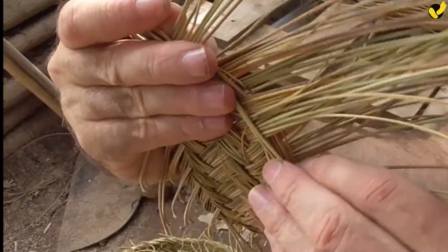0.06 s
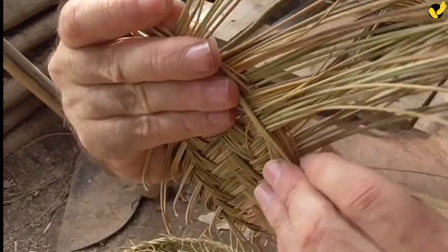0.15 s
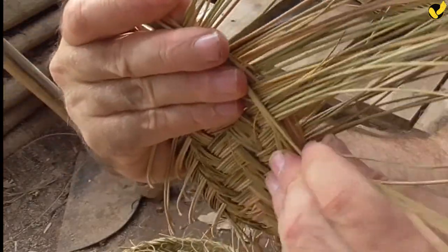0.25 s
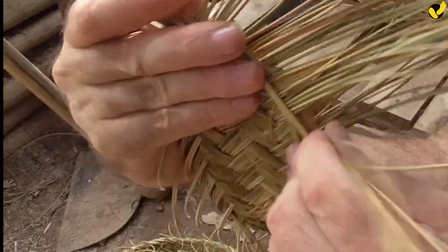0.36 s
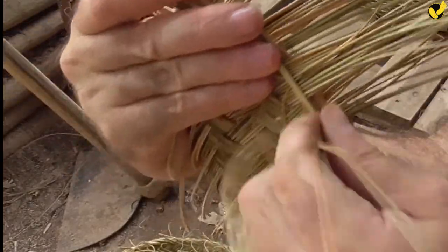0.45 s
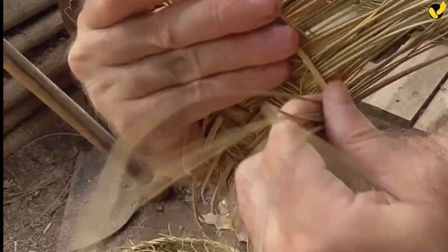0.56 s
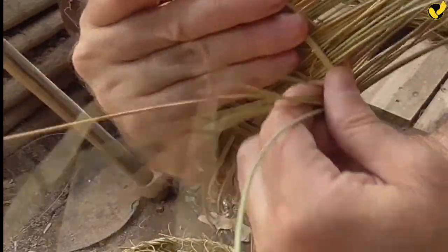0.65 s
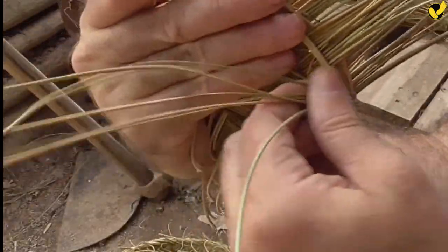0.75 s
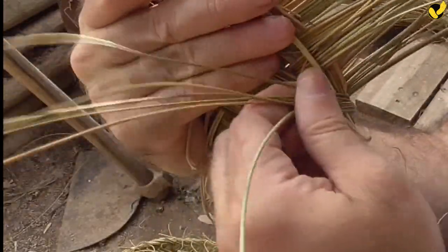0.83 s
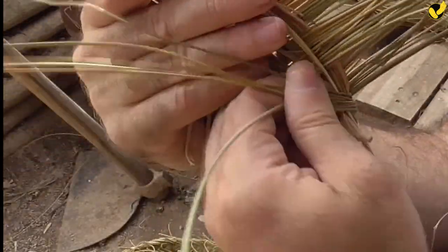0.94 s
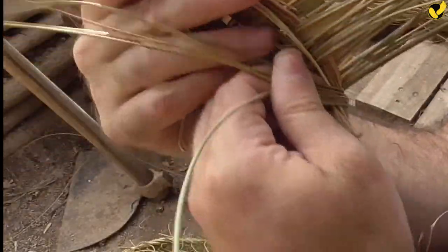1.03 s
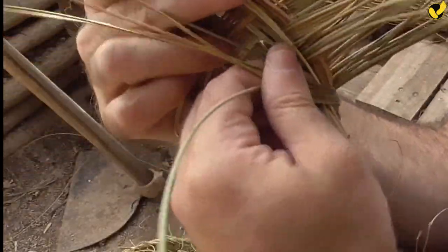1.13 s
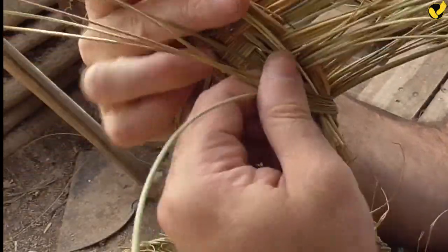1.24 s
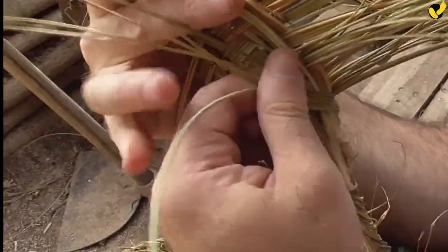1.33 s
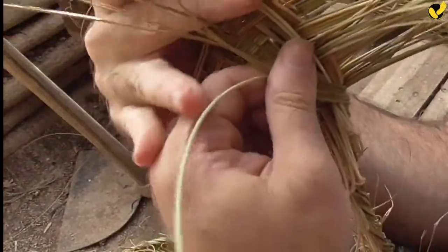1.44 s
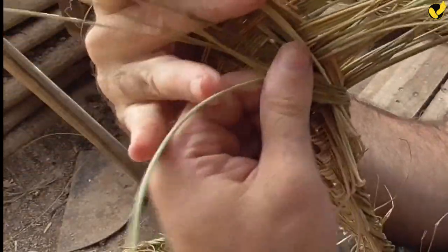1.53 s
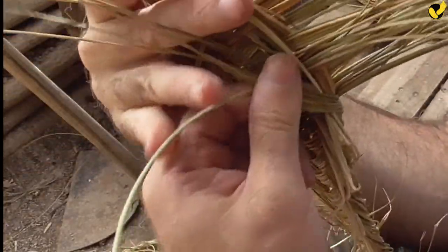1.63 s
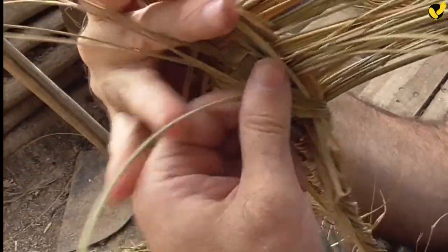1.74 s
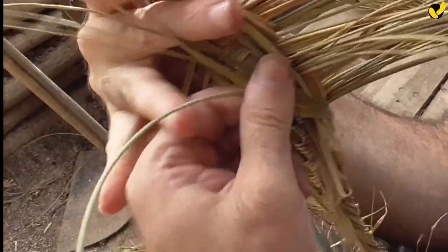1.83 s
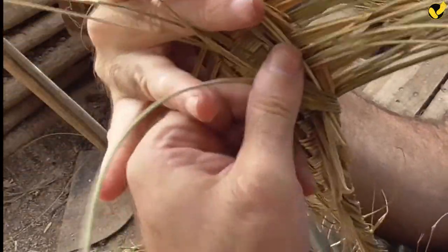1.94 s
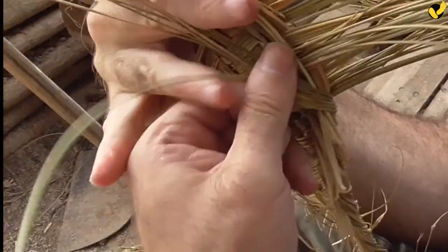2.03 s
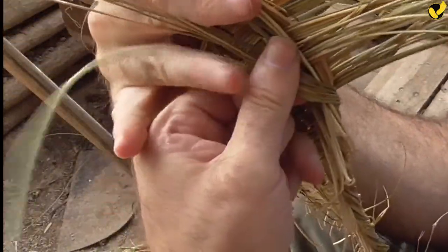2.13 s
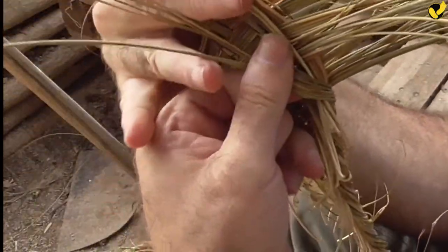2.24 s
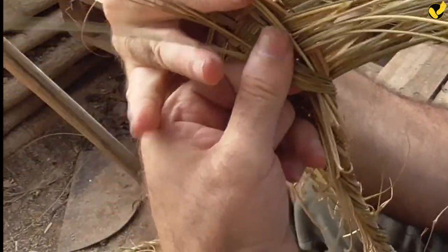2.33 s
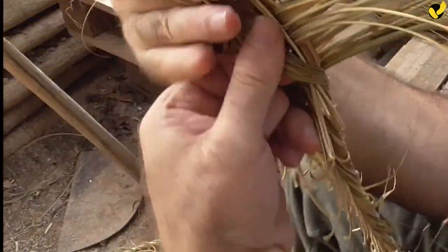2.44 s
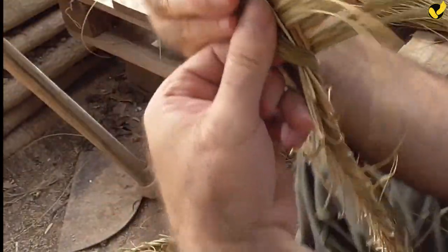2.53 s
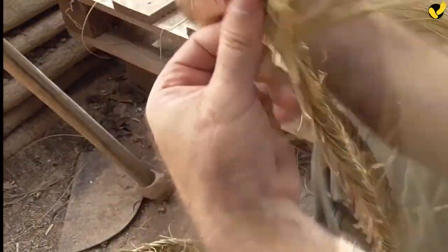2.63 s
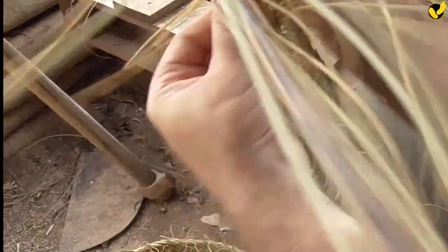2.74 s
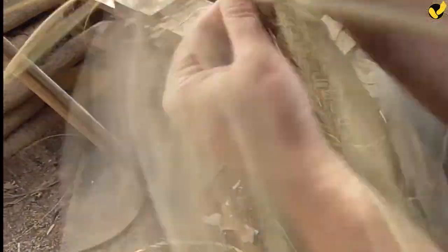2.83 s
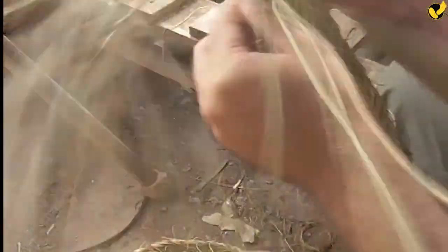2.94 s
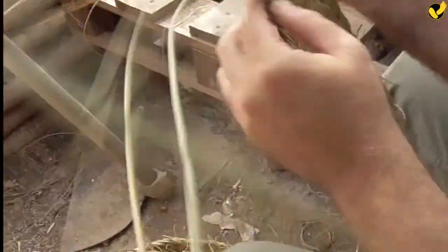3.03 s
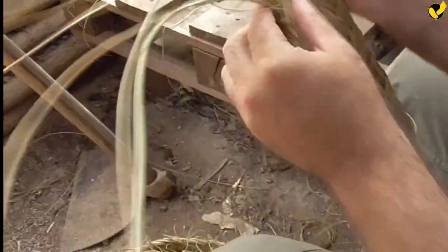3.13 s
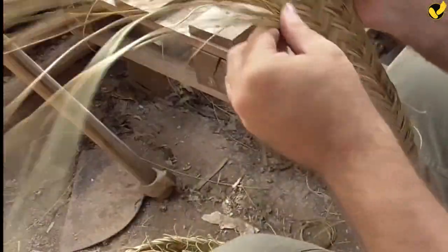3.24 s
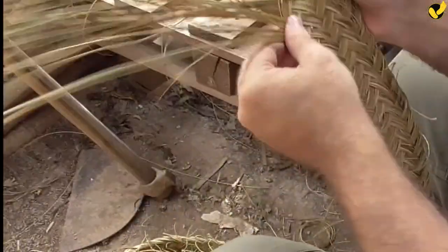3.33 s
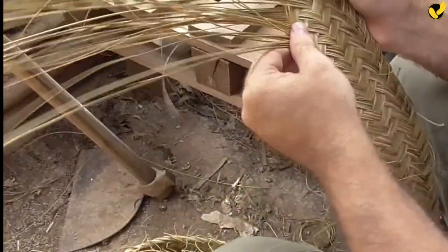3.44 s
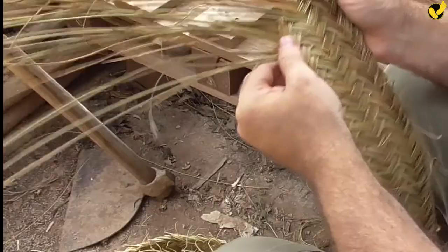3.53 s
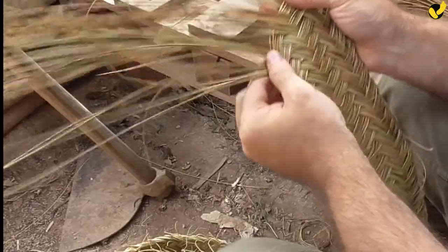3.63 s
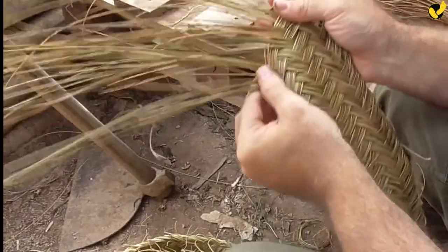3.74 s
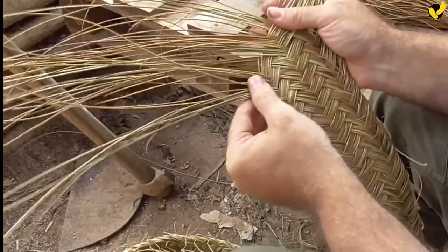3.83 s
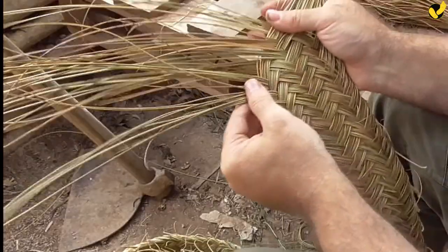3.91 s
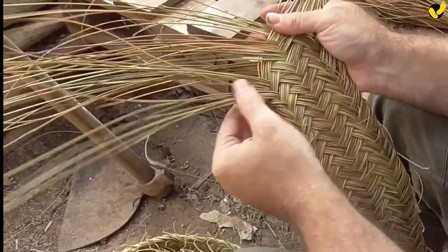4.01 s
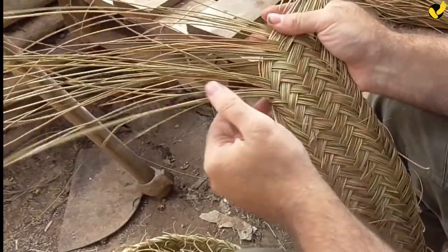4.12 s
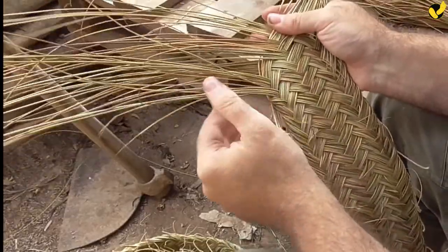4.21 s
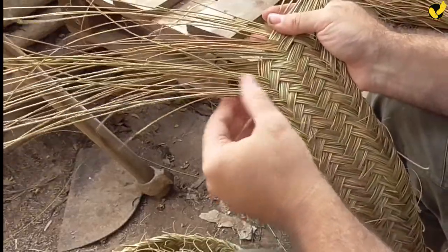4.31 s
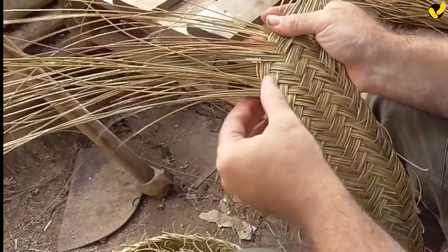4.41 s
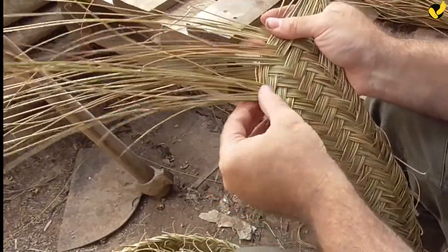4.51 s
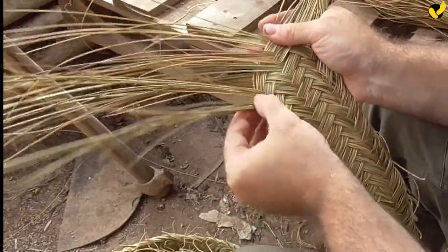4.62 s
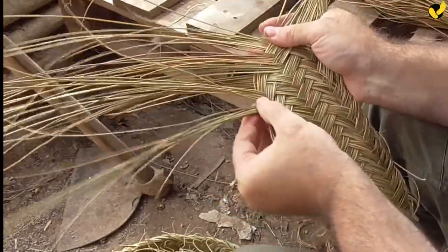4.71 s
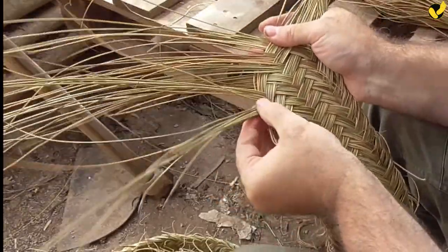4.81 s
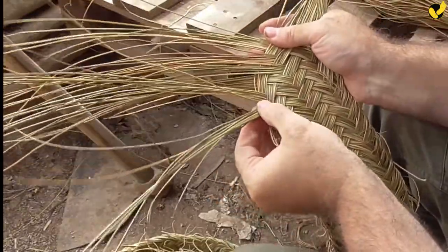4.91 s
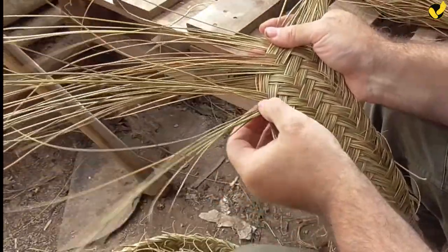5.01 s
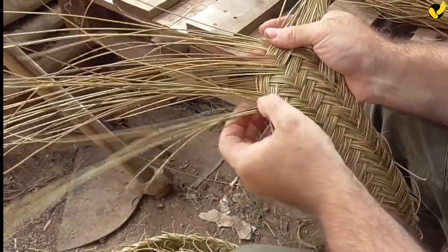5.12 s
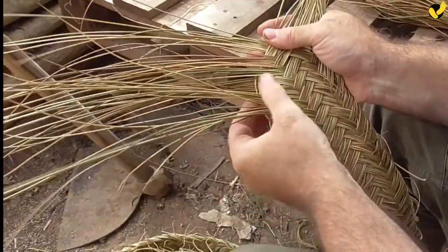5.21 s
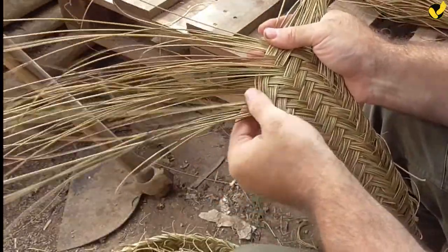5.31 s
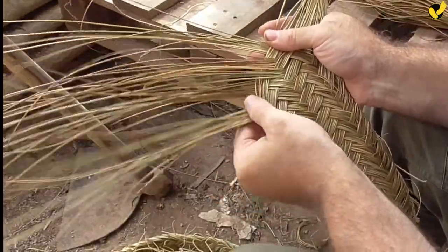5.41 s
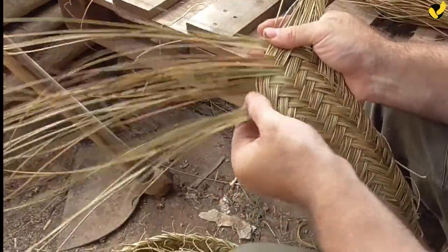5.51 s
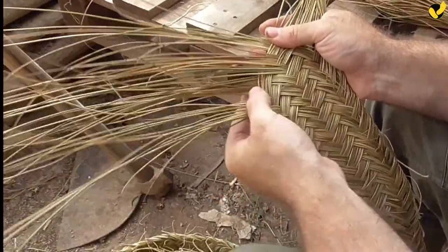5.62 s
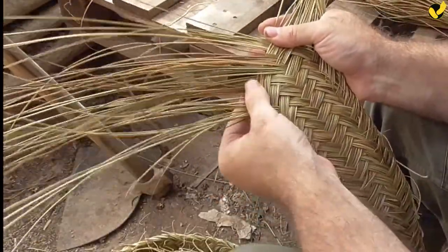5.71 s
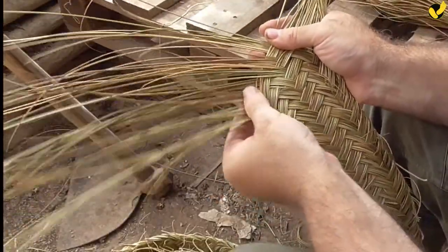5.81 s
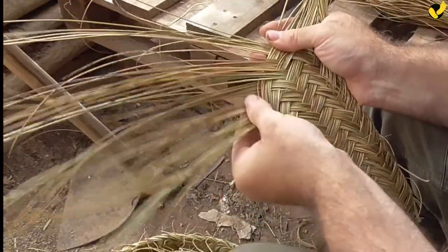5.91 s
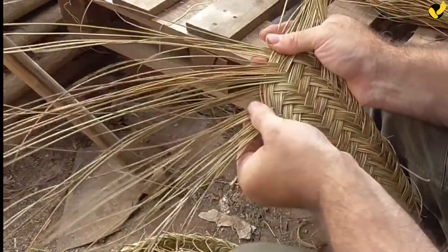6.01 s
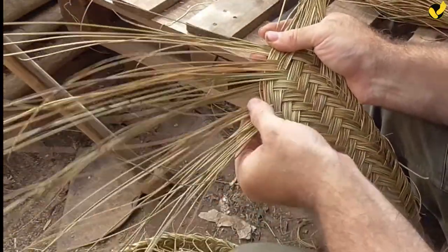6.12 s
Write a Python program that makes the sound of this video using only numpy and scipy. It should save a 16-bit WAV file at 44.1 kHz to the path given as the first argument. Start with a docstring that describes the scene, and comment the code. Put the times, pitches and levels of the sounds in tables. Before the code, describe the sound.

Close, crisp snaps and papery rustles of stiff grass being plaited, busiest around three seconds, then sparse ticks above a far rumble and faint hum.

```python
"""Hands braid dry grass strands close to a stereo microphone, outdoors.
Friction makes the rubbing: dense trains of tiny slips shape noise into bright and dull rustles and a creak.
Strands snap as decaying cracks, rings, knocks and drags; fingers bump the braid as low damped tones.
Behind them lie a far low roar of shaped noise, stronger towards the end, an intermittent hum and a faint hiss."""
import sys
import numpy as np
from scipy import signal
from scipy.fft import rfft, irfft, next_fast_len
from scipy.io import wavfile
from scipy.ndimage import uniform_filter1d, map_coordinates

SR = 44100
rng = np.random.default_rng(int(sys.argv[2]) if len(sys.argv) > 2 else 0)


def dump_mix(stems):
    """Bounce the given channels to the path in sys.argv[1] as a 16-bit WAV at rate SR."""
    frames = np.atleast_2d(stems).T  # one column per channel
    limited = np.clip(frames, -1, 1)  # hard clip at full scale
    pcm = np.round(limited * 32767).astype(np.int16)
    wavfile.write(sys.argv[1], SR, pcm)


N = 271656

# Continuous rubbing of the strands; thick strands and braid creak are relative to the rustle:
# time_s, rustle_db, thick_relative_db, creak_relative_db
RUBBING_LEVELS = [(0, -63.5, 0, 6.5), (.14, -59.5, 1, 7.5), (.18, -67.5, -5, 4), (.37, -61, -3, 0.5),
                  (.45, -63, -1, 4), (.56, -46.5, -0.5, -2.5), (.74, -50, -3.5, 1), (.8, -64, 3, -3),
                  (.92, -53, -7, 0), (1.02, -58.5, 2.5, 2.5), (1.25, -63.5, -2.5, 1), (1.57, -67, -0.5, 5),
                  (2.2, -63, 2, 0), (2.36, -52, -1.5, -5.5), (2.5, -60, 1.5, 4.5), (2.6, -48, -0.5, 0.5),
                  (2.8, -39.5, -2.5, 0), (2.87, -44, -0.5, -4.5), (2.95, -35.5, -2, -4.5),
                  (3.09, -39.5, 1, -7.5), (3.2, -53.5, -2, -2), (3.45, -57, -2.5, 1), (3.82, -61.5, -4, -4),
                  (3.88, -58, 0.5, 5), (4.24, -62.5, -7, 5.5), (4.97, -60.5, -2, 6.5),
                  (5.16, -65.5, -6, 8.5), (5.5, -57.5, 0, 6.5), (6.16, -58, -3.5, 4.5)]


def amp(db):
    """Decibels to amplitude ratio: 20 dB is a factor of ten."""
    return 10 ** (np.asarray(db) / 20)


def unit(x):
    """Normalisation to an rms of one."""
    return x / np.sqrt(np.mean(x ** 2) + 1e-20)


def along(points, hz):
    """Linear interpolation of (frequency, value) points over log frequency."""
    point_hz, values = np.transpose(points)
    return np.interp(np.log(hz + 1), np.log(point_hz + 1), values)


def curves(rows):
    """Linear interpolation in time: one value per sample for each column after the time."""
    times, *columns = np.transpose(rows)
    return [np.interp(np.arange(N) / SR, times, column) for column in columns]


def wobble(rate):
    """Slow random modulation: a smooth curve through random knots, rate of them a second."""
    knots = rng.standard_normal(int(N * rate / SR) + 4)
    return map_coordinates(knots, [np.arange(N) * rate / SR])


def panned(pan_db):
    """Stereo level difference: left and right gains pan_db apart."""
    return amp(np.array([pan_db / 2, -pan_db / 2]))


def filtered(x, response):
    """Linear filtering: the spectrum of x times a response of frequency."""
    size = next_fast_len(N + SR // 4)
    hz = np.fft.rfftfreq(size, 1 / SR)
    return irfft(rfft(x, size) * response(hz), size)[..., :N]


def coloured(pair, spectrum, alike):
    """Partial coherence: two unrelated signals, spectrally shaped and mixed to a left-right correlation."""
    hz = np.linspace(0, SR / 2, 2048)
    rms = np.sqrt(np.mean(amp(2 * along(spectrum, hz))))  # white noise of rms 1 stays at rms 1

    def mid_side(f):
        gain = amp(along(spectrum, f)) / rms
        angle = np.arccos(np.clip(along(alike, f), -1, 1)) / 2
        return gain * [np.cos(angle), np.sin(angle)]

    mid, side = filtered(pair, mid_side)
    return np.array([mid + side, mid - side])


def patchy(depth_db):
    """Non-stationary noise: two noises share patches of random gain in time and frequency."""
    z = signal.stft(rng.standard_normal((2, N)), nperseg=512)[2]
    field = rng.standard_normal(z.shape[1:])
    field = uniform_filter1d(field, size=4, axis=0)  # along frequency
    field = uniform_filter1d(field, size=7, axis=1)  # along time
    noise = signal.istft(z * amp(depth_db * unit(field)), nperseg=512)[1]
    return unit(noise[:, :N])


def grains(per_second, spread_db, top_db, t60, smooth):
    """Friction as random slips: scattered sizes up to a limit, exponential decay, over a smooth share."""
    chance = rng.random((2, N))
    sizes = amp(np.minimum(-spread_db * np.log(chance[1] + 1e-9), top_db))
    slips = (chance[0] < per_second / SR) * sizes
    t = np.arange(SR // 20) / SR
    decaying = signal.fftconvolve(slips, amp(-60 * t / t60))[:N]
    return unit(smooth + unit(decaying))


def background():
    """Superposition of distant sounds: spectrally shaped roar and hiss, and a frequency-modulated hum."""
    # Far roar: time_s, level_db
    roar_levels = [(0, -51), (.79, -50), (1.15, -52), (2.98, -50), (3.17, -47.5), (3.67, -51),
                   (3.86, -47.5), (4.05, -44), (4.5, -43), (6.16, -42.5)]
    # Hum that comes and goes: time_s, level_db
    hum_levels = [(0, -55.5), (.17, -46.5), (.5, -61), (1.15, -74), (1.44, -53), (1.7, -53.5), (1.84, -67),
                  (2.3, -62), (3.7, -83), (4.01, -55.5), (4.45, -45.5), (4.6, -54), (4.75, -46.5),
                  (5.04, -52), (5.12, -59), (5.46, -46), (5.55, -62), (6.16, -73)]
    # Roar spectrum: frequency_hz, relative_density_db
    roar_spectrum = [(15, -39), (25, -17.5), (54, -2.5), (108, -3.5), (169, -1.5), (302, -12), (465, -13.5),
                     (728, -21.5), (983, -24.5), (1280, -34), (2200, -48), (2860, -53), (4840, -120)]
    # Hiss spectrum: frequency_hz, relative_density_db
    hiss_spectrum = [(880, -14), (1500, -2.5), (1890, -12), (2880, -13), (11800, -12), (15400, -17),
                     (16000, -35), (16500, -51)]
    # Left-right likeness of the roar: frequency_hz, correlation
    roar_alike = [(60, 0.96), (180, 0.92), (550, 0.81), (1650, 0.7), (4970, -0.23), (15000, -0.16)]
    hum_hz, hiss_db = 155.8, -62.5
    roar_db = curves(roar_levels)[0] + 1.6 * wobble(6.8)
    roar = amp(roar_db) * coloured(patchy(1.0), roar_spectrum, roar_alike)
    phase = 2 * np.pi * np.cumsum(hum_hz + 0.26 * wobble(3)) / SR  # the pitch drifts slightly
    hum = np.sqrt(2) * amp(curves(hum_levels)[0]) * np.sin(phase)  # levels are rms
    hiss = amp(hiss_db) * coloured(patchy(0.34), hiss_spectrum, [(3000, -0.07)])
    return roar + hum + hiss


def bumps():
    """Damped oscillation: soft fingers on the braid excite a few low cycles that die exponentially."""
    # Finger bumps: start_s, level_db, pitch_hz, t60_s, left_minus_right_db
    bump_rows = [(0.053, -31, 437, 0.034, 0), (0.085, -42, 457, 0.043, -2), (0.128, -35, 476, 0.04, -1.0),
                 (0.411, -27, 362, 0.018, 2), (0.747, -38, 310, 0.065, 14), (1.511, -49, 229, 0.032, 7),
                 (1.899, -40.5, 400, 0.041, 4), (2.324, -33, 386, 0.023, -2), (2.428, -34, 221, 0.02, 0),
                 (2.768, -34, 333, 0.043, -9), (2.806, -37, 284, 0.029, -14), (3.021, -30, 242, 0.057, -5),
                 (3.053, -35.5, 510, 0.052, -17), (4.974, -28, 235, 0.032, 5),
                 (5.633, -33.5, 372, 0.044, -5)]
    out = np.zeros((2, N + SR))
    t = np.arange(SR // 5) / SR
    for start, db, hz, t60, pan_db in bump_rows:
        push = amp(db - 60 * t / t60) * (1 - np.exp(-t / 0.0011))
        phase = 0.034 * np.cumsum(rng.standard_normal((2, len(t))), axis=1)  # a random walk, in radians
        tone = np.sin(2 * np.pi * hz * t + phase)
        out[:, round(start * SR):][:, :len(t)] += panned(pan_db)[:, None] * push * tone
    return out[:, :N]


def ticks():
    """Random point process: extra snap rows at chance moments, their level following the rubbing."""
    per_second, over_rustle_db, spread_db = 9, 16.5, 2.5
    middle_hz, middle_t60_s = 8860, 0.012
    knock_db, drag_db, pan_spread_db = -14, -16, 3.5
    chance = rng.random(round(per_second * N / SR))
    scatter = rng.standard_normal((len(chance), 4))
    starts = chance * N / SR
    times, rustle_db = np.transpose(RUBBING_LEVELS)[:2]
    db = np.interp(starts, times, rustle_db) + over_rustle_db + spread_db * scatter[:, 0]
    hz = np.clip(middle_hz * np.exp(0.22 * scatter[:, 1]), 0, SR / 3)
    t60 = middle_t60_s * np.exp(0.45 * scatter[:, 2])
    pan_db = pan_spread_db * scatter[:, 3]
    return [(*row, knock_db, life, drag_db, pan)
            for *row, life, pan in zip(starts, db, hz, t60, pan_db)]


def snaps():
    """Impulsive release: a strand lets go with a crack and short ring, a knock in the braid and a noisy drag."""
    # Snaps; the knock and drag are relative to the snap level:
    # start_s, level_db, ring_hz, knock_relative_db, crack_t60_s, drag_relative_db, left_minus_right_db
    snap_rows = [(.0257, -36, 11200, -35, .006, -12, -3), (0.0365, -13.5, 4670, -41, 0.012, -18, 1),
                 (.045, -29.5, 4860, -23, .014, -15, 6), (.0695, -37.5, 5350, -5, .008, -18, 5),
                 (.0868, -34.5, 7440, -5, .009, -13, 5), (0.113, -37, 7500, -8, .012, -14, -3),
                 (0.2254, -33, 12100, -27, .006, -21, -5), (0.2402, -34.5, 12000, -13, .014, -21, 0),
                 (.2609, -38, 9600, -18, .008, -16, -4), (0.2772, -34.5, 10800, -11, .012, -20, 1),
                 (.2972, -40, 13400, -15, .014, -18, -1), (0.316, -40, 7740, -15, .006, -15, 3),
                 (0.4038, -21.5, 3980, -22.5, 0.013, -16, 0), (0.418, -36, 10300, -13, .011, -21, -2),
                 (0.473, -23.5, 10700, -29, .014, -16, -1), (0.485, -33, 11400, -13, .014, -19, 2),
                 (.507, -32.5, 10800, -9, .014, -7, -1), (.515, -27, 10500, -14.5, 0.0074, -18, -1),
                 (.5273, -32, 10500, -22, .012, -18, -2), (0.5396, -33, 13000, -19, .008, -18, -6),
                 (.55, -10.5, 4820, -18, .009, -29, -0.5), (0.5744, -35, 11200, -12, .012, -15, -1),
                 (0.5928, -25, 10600, -12, .009, -16, 1), (0.6038, -16.5, 5920, -23, 0.017, -24, 1),
                 (0.6657, -21, 10700, -19, 0.03, -12, -2), (.7867, -30, 3480, -15, .009, -20, 6),
                 (0.8301, -29.5, 11100, -9.5, .018, -19, 0), (0.8604, -29.5, 10800, -13.5, .012, -16, 4),
                 (.8943, -36, 8100, -15, .007, -13, -4), (0.9308, -23, 7870, -22, 0.0093, -21, 3),
                 (0.9692, -15.5, 10400, -23, 0.027, -11, -2.5), (1.0271, -30.5, 11250, -15, .008, -18, 2),
                 (1.0603, -37, 8500, -17, 0.023, -16, 7), (1.1695, -32.5, 12200, -20, .006, -18, -4),
                 (1.2907, -41.5, 8450, -12, 0.018, -13, 5), (1.3432, -45, 9500, -17, .018, -12, 1),
                 (1.3668, -38.5, 8600, -25, 0.0076, -11, 2), (1.505, -41, 5600, 0, 0.024, -7, -1.5),
                 (1.6264, -26.5, 9900, -36, .005, -18, -14), (1.6348, -31.5, 12700, -21, 0.0062, -18, -1),
                 (1.6702, -37, 9200, -14, .005, -7, 0), (1.6857, -31, 10100, -24, .005, -23, -4),
                 (1.7044, -33.5, 10200, -29, 0.0055, -25, -9), (1.8304, -44, 8200, -18, .007, -19, 3),
                 (1.9403, -27.5, 9250, -21, 0.0053, -22, -1), (2.2601, -24.5, 9830, -35, 0.055, -21, 7.5),
                 (2.3002, -30.5, 7860, -28, 0.042, -12, -1), (2.3233, -26.5, 8600, -23, .008, -6, 1),
                 (2.3764, -19, 7380, -38, 0.045, -15, -0.5), (2.3948, -27, 7260, -34, .025, -11, -3),
                 (2.4278, -37, 3930, -2.5, .028, -15, 4), (2.468, -34.5, 10800, -30, 0.0081, -19, 4),
                 (2.521, -32, 4000, -16, 0.0084, -20, 2), (2.5547, -34, 10800, -27, .025, -13, 2),
                 (2.5788, -21, 5100, -23, 0.0075, -9, 3), (2.6067, -28.5, 7330, -7.5, .021, -12, 1),
                 (2.6402, -9.5, 9150, -17.5, 0.01, -23, -0.5), (2.665, -17, 11600, -24, .017, -14, -5),
                 (2.695, -8, 11960, -23, 0.0057, -27, -4), (2.7203, -22, 9800, -18, .014, -16, 0),
                 (2.742, -19, 10800, -13, 0.019, -13, -10), (2.7555, -21, 9000, -13, .008, -16, -3),
                 (2.8789, -15.5, 3780, -23, .009, -16, 3), (2.8857, -16, 9300, -26, .008, -12, -14),
                 (2.898, -4.5, 8500, -30, 0.0029, -25, -3), (3.0231, -15.5, 11000, -14, .006, -22, -2),
                 (3.055, -16.5, 9900, -13, 0.014, -23, 3), (3.068, -15, 10500, -21, .015, -10, -5),
                 (3.092, -16, 9900, -35, .009, -7, -15), (3.2416, -30, 10400, -16, .02, -18, 2),
                 (3.2818, -28, 11100, -26, .005, -19, -6), (3.2878, -34, 9900, -18, .005, -14, 3),
                 (3.2956, -24.5, 12250, -25, 0.024, -13, -6), (3.3138, -27, 10200, -18, .007, -8, 0),
                 (3.323, -28, 11100, -14, .024, -16, -3), (3.3667, -25.5, 11200, -27, .015, -14, 4),
                 (3.3736, -31, 9200, -34, .019, -17, -1), (3.3875, -21.5, 7800, -24, .008, -9, 4),
                 (3.3964, -20.5, 7400, -17, .014, -17, 3.5), (3.4055, -18, 8900, -34, .006, -20, -8),
                 (3.4209, -24, 8700, -20, 0.013, -16, -3), (3.6365, -18.5, 8600, -25, 0.0034, -6.5, -4.5),
                 (4.0188, -40, 11000, -28, .006, -13, -4), (4.389, -40, 10850, -13, .027, -15, -6),
                 (4.892, -38, 5100, -17, .006, -16, -6), (4.914, -40, 9100, -18, .006, -16, 1),
                 (5.0069, -36.5, 9200, -14, 0.086, -17, -2), (5.325, -34, 10800, -13, .009, -18, -4),
                 (5.498, -30, 10600, -21, 0.0056, -18, -9), (5.539, -34, 6660, -18, 0.017, -6, -2),
                 (5.6372, -16.5, 9470, -29, 0.0032, -20, -6.5), (5.8336, -30.5, 8350, -21, 0.0062, -18, 4),
                 (5.8507, -28, 9300, -27, 0.0073, -24, 7), (5.9404, -29, 11100, -23, .004, -22, -10),
                 (5.9922, -28.5, 6500, -21, .023, -9, 1)]
    # Crack spectrum: frequency_hz, relative_density_db
    crack_spectrum = [(880, -12), (1500, -15.5), (1970, -18.5), (3830, -4), (6470, -5), (7150, -1),
                      (8230, -2.5), (11800, -0.5), (15400, -14), (16700, -64)]
    # Spectrum of the braid when struck: frequency_hz, relative_density_db
    knock_spectrum = [(150, -19), (250, -0.5), (1030, -4.5), (1320, 2.5), (1420, 2.5), (1610, -17),
                      (1880, -11), (2200, -12), (2860, -43), (4840, -120)]
    # Left-right likeness of cracks and knocks: frequency_hz, correlation
    snap_alike = [(500, 0.42), (1500, 0), (4000, 1), (10000, 0.22)]
    crack_db, ring_db = -10.5, -12.5  # relative to the snap level
    spike_db, spike_t60_s = 2.5, 0.0012  # the first spike, relative to the crack
    knock_t60_s, drag_t60_s = 0.021, 0.05
    crack, knock, ring = np.zeros((3, 2, N + SR))
    t = np.arange(SR // 6) / SR
    rise = 1 - np.exp(-t / 0.0002)
    for start, db, hz, knock_db, t60, drag_db, pan_db in snap_rows + ticks():
        at = slice(round(start * SR), round(start * SR) + len(t))
        blow = rise * amp(-60 * t / t60)
        blow = amp(db) * blow / blow.max()
        spike = rise * amp(db + spike_db - 60 * t / spike_t60_s)
        drag = rise * amp(db + drag_db - 60 * t / drag_t60_s)
        sides = panned(pan_db)[:, None]
        noise = rng.standard_normal((3, 2, len(t)))
        # random signs keep the crack noise at full strength in every sample
        burst = (blow + spike) * np.sign(noise[0]) + drag * noise[0]
        crack[:, at] += amp(crack_db) * sides * burst
        knock[:, at] += sides * rise * amp(db + knock_db - 60 * t / knock_t60_s) * noise[1]
        phase = 0.098 * np.cumsum(noise[2], axis=1)  # the ring loses step quickly
        tone = np.sin(2 * np.pi * hz * t + phase)
        ring[:, at] += amp(ring_db) * sides * (blow + 1.46 * drag) * tone
    cracks = coloured(crack[:, :N], crack_spectrum, snap_alike)
    knocks = coloured(knock[:, :N], knock_spectrum, snap_alike)
    return cracks + knocks + ring[:, :N]


def strokes():
    """Amplitude modulation: each stroke along the bundle swells and fades as a Gaussian in three layers."""
    # Strokes of one strand; thick strands and braid creak are relative to the thin strands:
    # middle_s, level_db, half_length_s, thick_relative_db, creak_relative_db, left_minus_right_db
    stroke_rows = [(0.048, -53.5, 0.036, 10, 1, -3), (0.133, -62.5, 0.026, 0, 10, -6),
                   (0.407, -63, .025, 4, 10, 3), (0.472, -49.5, 0.048, -2.5, -19, -4),
                   (0.603, -46, 0.023, 8, -10, 2), (0.655, -38.5, 0.053, -9, -23, 0),
                   (0.756, -39.5, .087, -2.5, -5, 0), (0.813, -43, 0.059, -3.5, -11, -2),
                   (1.19, -57, 0.061, 3.5, -0.5, -3), (1.58, -49, 0.033, -3.5, -19, -5),
                   (2.033, -61, 0.057, 5, -8, -2), (2.107, -68.5, 0.037, 11.5, -5, -3),
                   (2.246, -52.5, 0.036, 6.5, -20, -3), (2.29, -47.5, 0.073, -2.5, -11, 0),
                   (2.393, -49, .066, -2, -25, -5), (2.687, -39, 0.065, 2.5, 7, 1.5),
                   (2.76, -37, 0.069, -1, 2, -5), (2.82, -44, 0.063, -11, 5.5, -4),
                   (2.917, -30, 0.051, -7.5, -13, -2.5), (3.013, -31.5, 0.05, -11, -21, -9),
                   (3.112, -33.5, 0.051, -6, -18, -1), (3.15, -43, 0.082, -1.5, 1.5, 2),
                   (3.32, -49, 0.068, -8, -13, 1), (3.398, -43.5, .043, 1.5, -6, 3),
                   (3.873, -58, 0.051, -3, 2, -1), (3.986, -49.5, 0.04, -3.5, -9, 0),
                   (4.985, -64, .028, 4, 10, -3), (5.36, -61, 0.082, -5, 5, -3),
                   (5.55, -61.5, 0.018, 10, 2, -6), (5.851, -58, .05, 7.5, 1, 4),
                   (6.013, -58.5, 0.1, 1, -8, -1)]
    gains = np.zeros((3, 2, N))  # thin strands, thick strands, creak; left and right
    t = np.arange(N) / SR
    for middle, db, half, thick_db, creak_db, pan_db in stroke_rows:
        at = slice(max(round((middle - half) * SR), 0), round((middle + half) * SR))
        bell = np.exp(-8 * ((t[at] - middle) / half) ** 2)
        swell = panned(pan_db)[:, None] * amp(db) * bell
        gains[..., at] += swell * amp([0, thick_db, creak_db])[:, None, None]
    return gains


def rubbing():
    """Sliding friction: bright slips of strand over strand, and duller ones heard through the braid."""
    # Spectrum of thin strands and tips: frequency_hz, relative_density_db
    thin_spectrum = [(3530, -45), (6000, -12), (8340, -1), (12000, -1.5), (13900, -9.5), (15200, -8.5),
                     (15900, -32), (16700, -66)]
    # Spectrum of thick strands: frequency_hz, relative_density_db
    thick_spectrum = [(880, -16.5), (1500, -5.5), (1760, -16.5), (2740, -3), (4080, 0.5), (4420, 1),
                      (5930, -0.5), (6500, -2.5), (8450, -1.5), (14300, -120)]
    # Spectrum of the braid body's creak: frequency_hz, relative_density_db
    braid_spectrum = [(140, -23), (240, 4), (345, 0.5), (378, -0.5), (499, -1), (710, -1), (1020, -1),
                      (1700, -12), (2200, -13.5), (2860, -21), (4840, -120)]
    # Left-right likeness of the rubbing: frequency_hz, correlation
    rub_alike = [(300, -0.53), (1400, 0.0044), (3500, 0.4), (7000, 0.083)]
    rustle_db, thick_db, creak_db = curves(RUBBING_LEVELS)
    # left minus right in dB, from light handling (-61 dB rustle) to hard sweeps (-30 dB)
    pan_db = np.interp(rustle_db, [-61, -30], [-1.5, -3])
    jerks_db = 0.93 * wobble(43) + 1.33 * wobble(120)  # the pull is uneven
    slips = amp(jerks_db) * grains(600, spread_db=4.5, top_db=16, t60=0.0022, smooth=2.5)
    dull_slips = amp(1.4 * jerks_db) * grains(200, spread_db=1.5, top_db=8, t60=0.016, smooth=4.4)
    dull = unit(dull_slips * patchy(2.96))
    thin_gain, thick_gain, creak_gain = strokes()
    thin_gain = thin_gain + panned(pan_db) * amp(rustle_db)
    thick_gain = thick_gain + panned(pan_db + 1.0) * amp(rustle_db + thick_db)
    creak_gain = creak_gain + panned(pan_db) * amp(rustle_db + creak_db)
    thin = thin_gain * coloured(unit(slips * patchy(2.6)), thin_spectrum, rub_alike)
    thick = thick_gain * coloured(unit(slips * patchy(3.5)), thick_spectrum, rub_alike)
    creak = creak_gain * coloured(dull, braid_spectrum, rub_alike)
    return thin + thick + creak


def scene():
    """Superposition: the pressures of all sources add at the two microphones."""
    return rubbing() + snaps() + bumps() + background()


def record(dry):
    """Frequency response: the microphone's dip just under 2 kHz, and a sharp band limit."""
    # Microphone response: frequency_hz, gain_db
    mic_response = [(1300, -0.5), (1550, -0.5), (1750, -3), (2300, -0.5)]
    top_hz = 16800
    return filtered(dry, lambda hz: amp(along(mic_response, hz)) * (hz < top_hz))


dry = scene()
out = record(dry)
dump_mix(out)
```